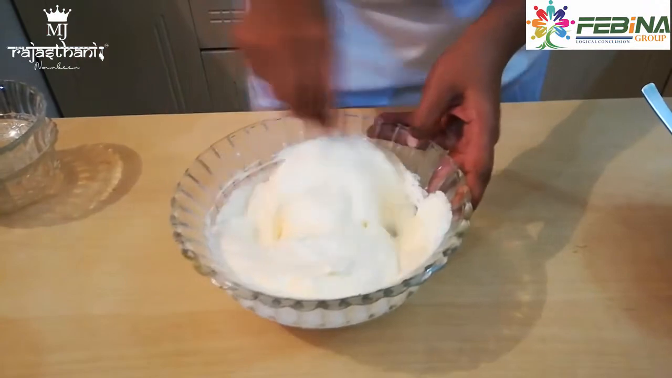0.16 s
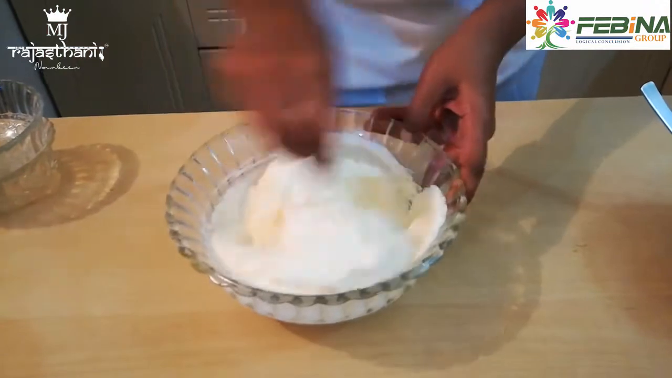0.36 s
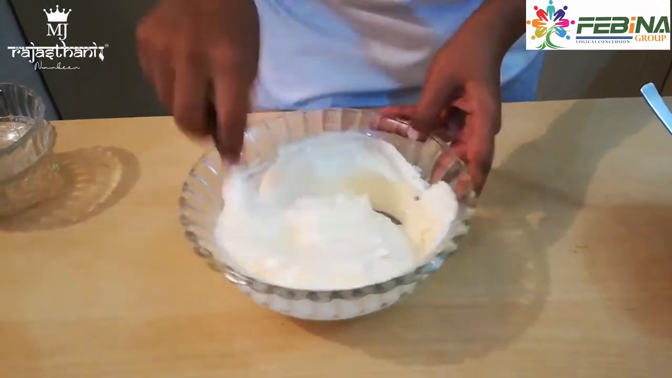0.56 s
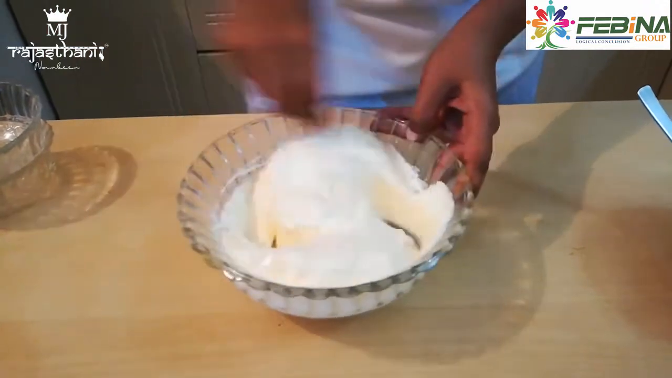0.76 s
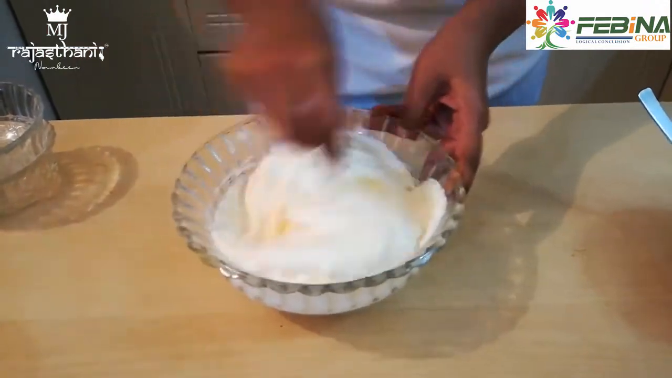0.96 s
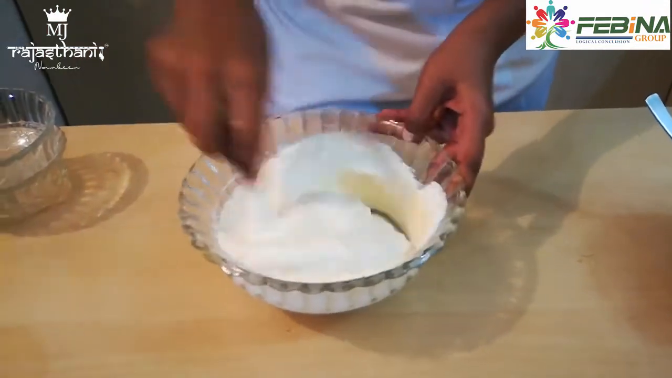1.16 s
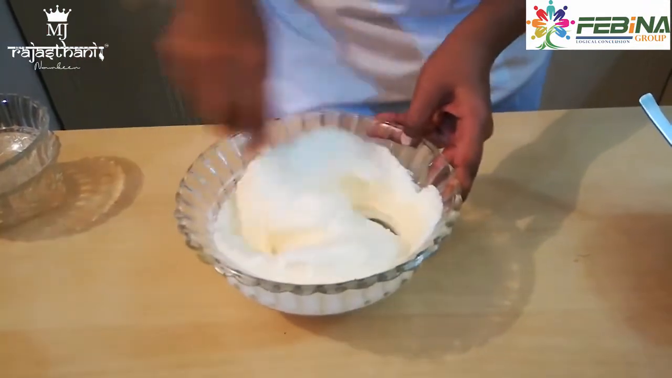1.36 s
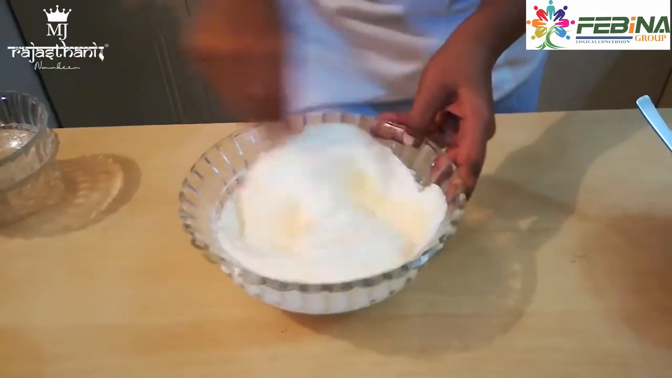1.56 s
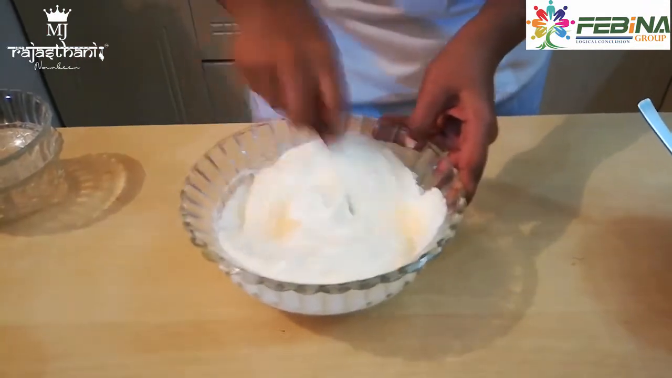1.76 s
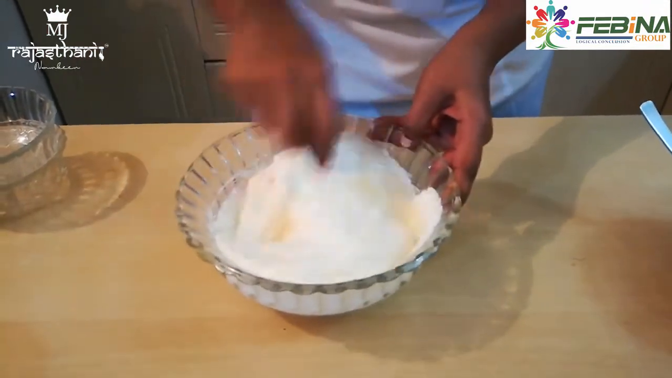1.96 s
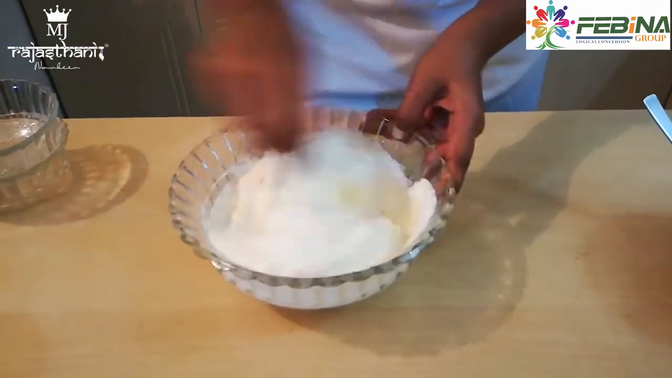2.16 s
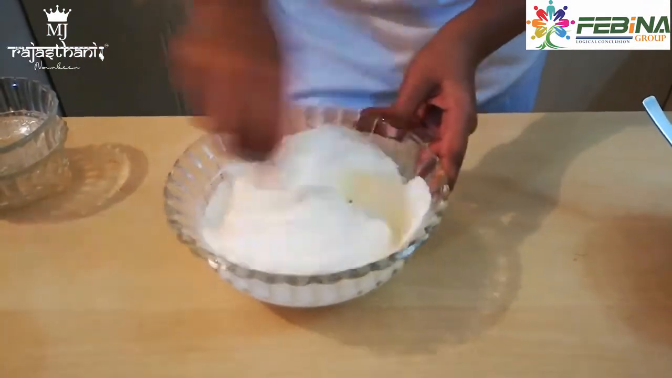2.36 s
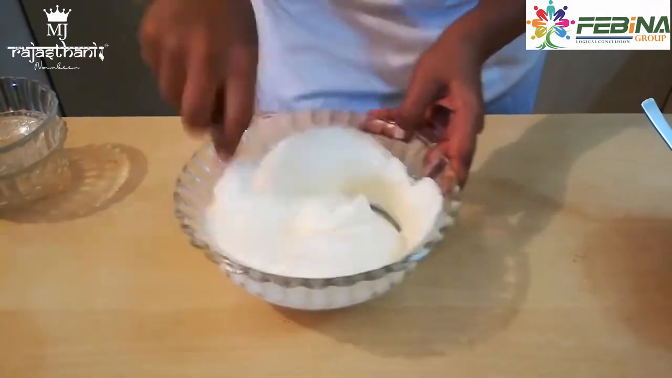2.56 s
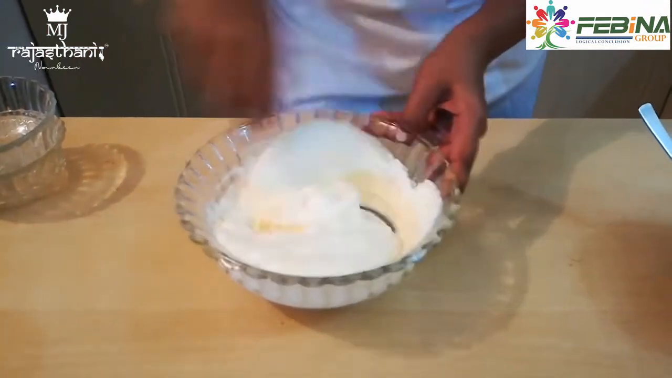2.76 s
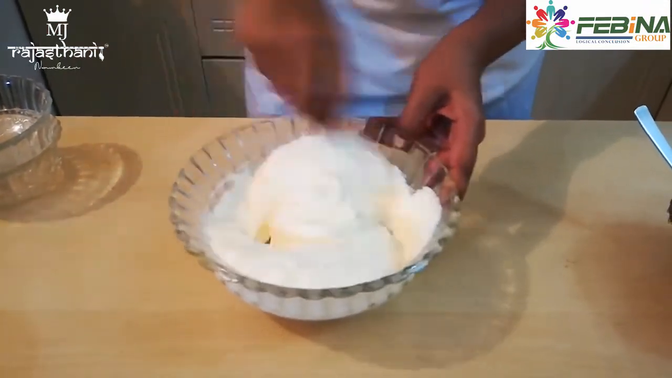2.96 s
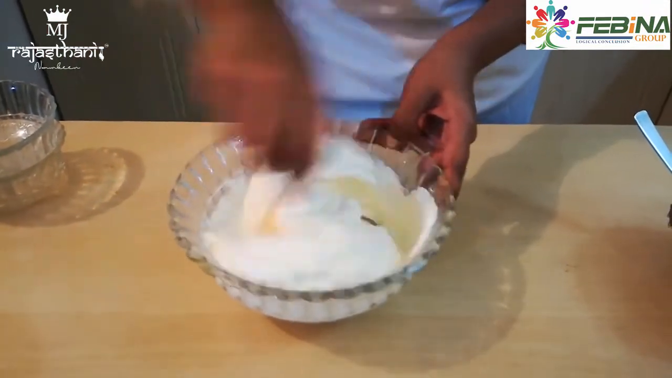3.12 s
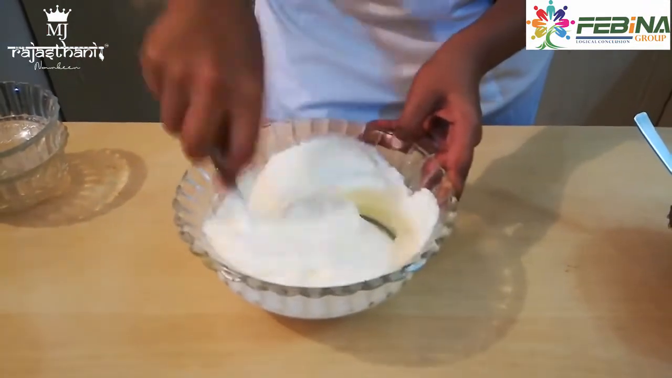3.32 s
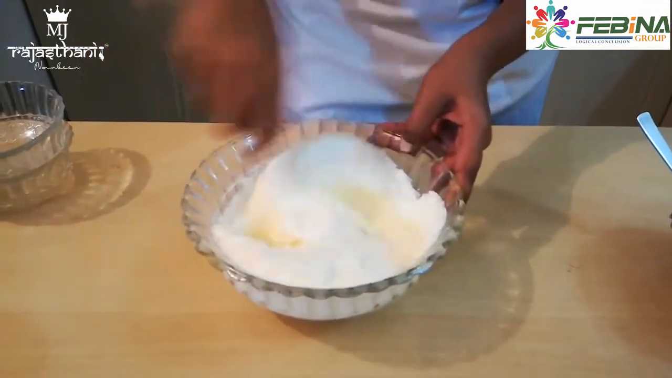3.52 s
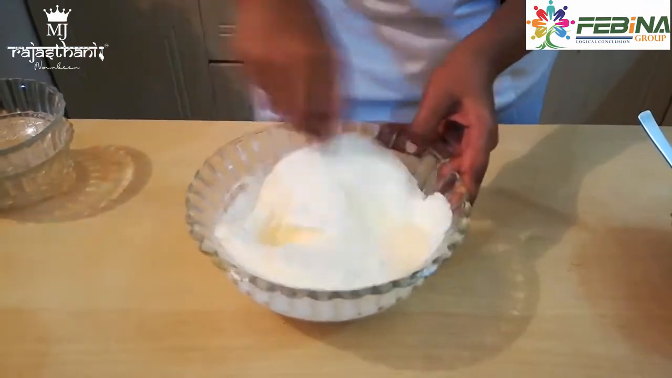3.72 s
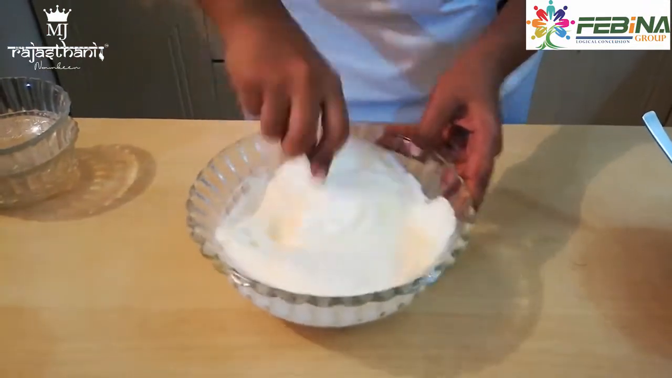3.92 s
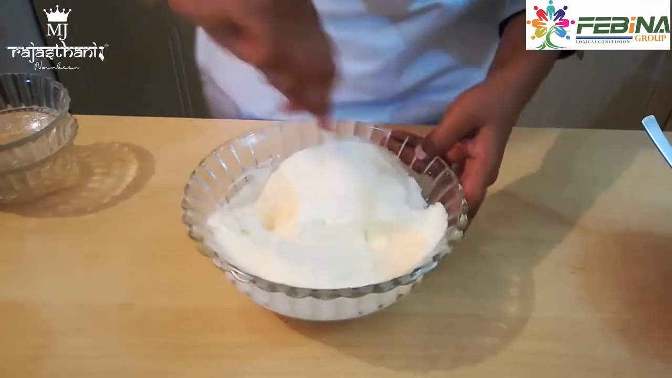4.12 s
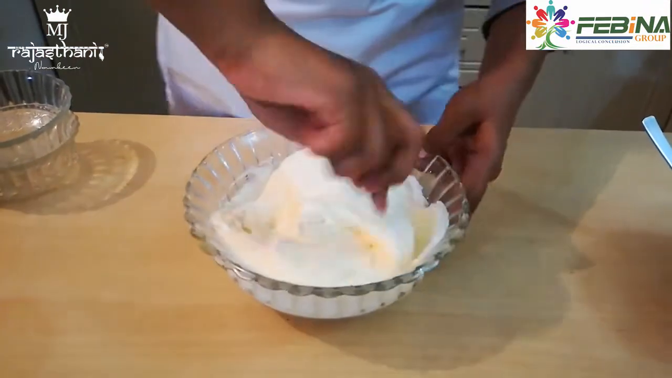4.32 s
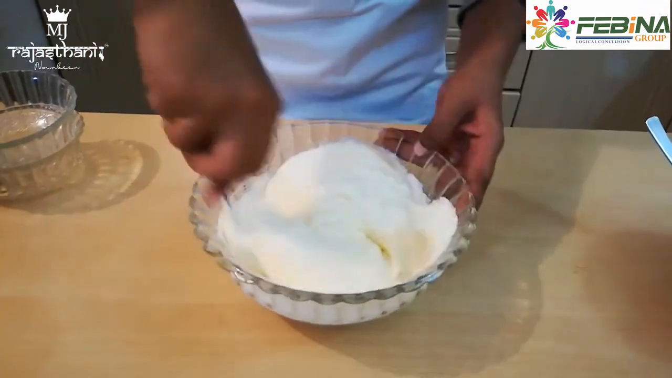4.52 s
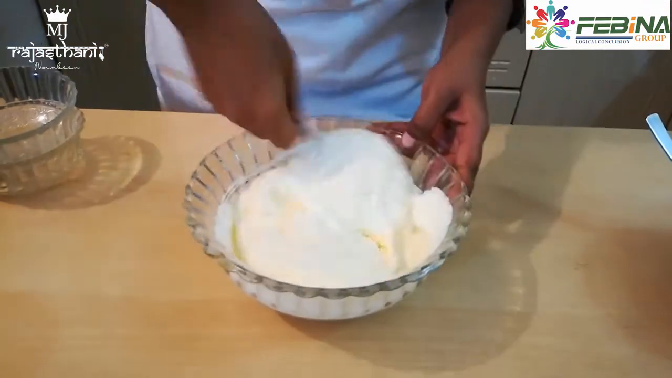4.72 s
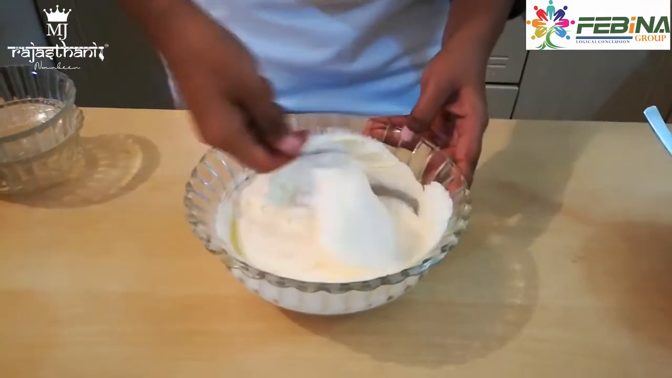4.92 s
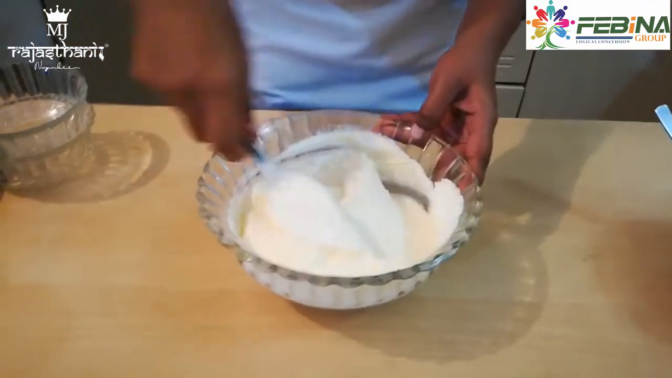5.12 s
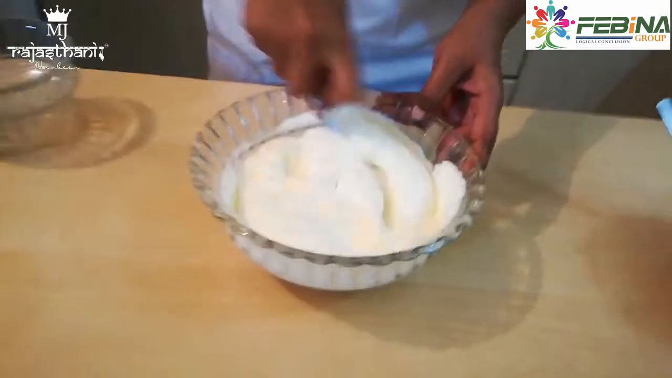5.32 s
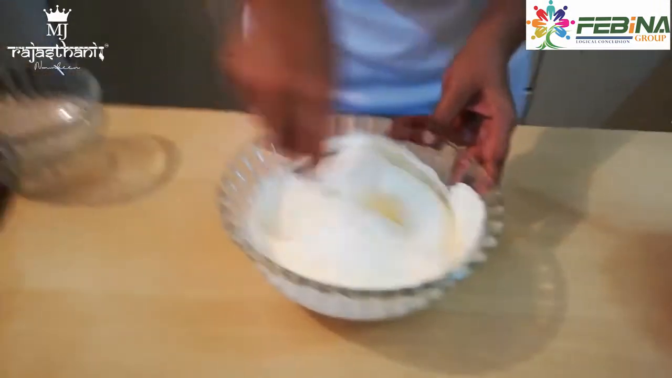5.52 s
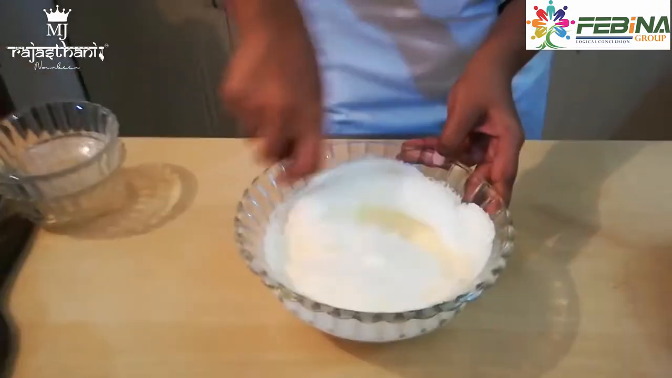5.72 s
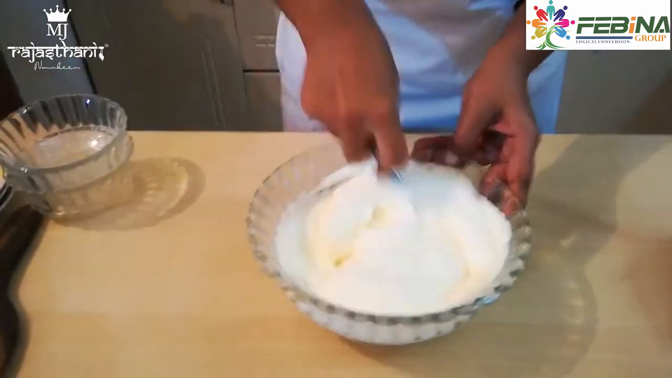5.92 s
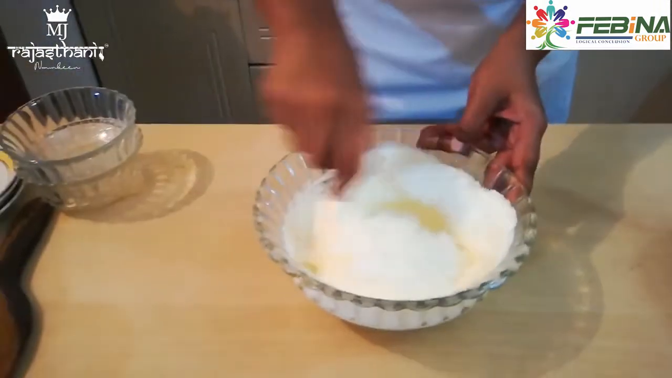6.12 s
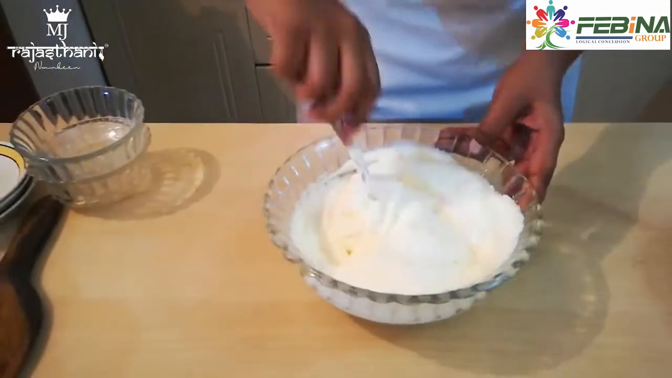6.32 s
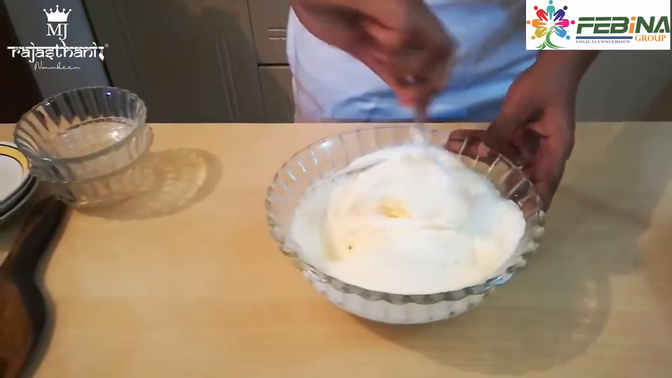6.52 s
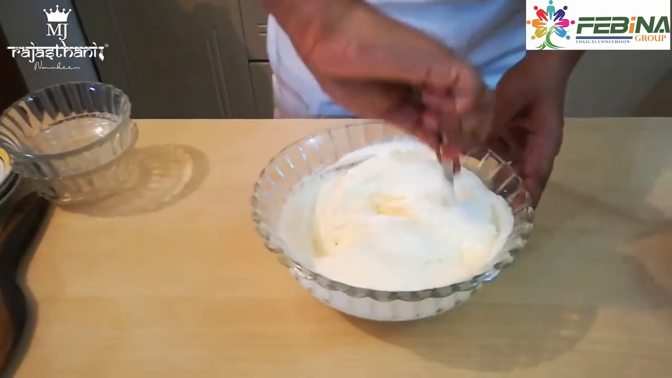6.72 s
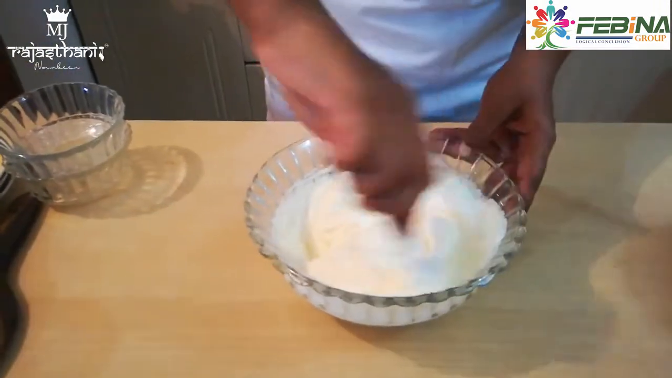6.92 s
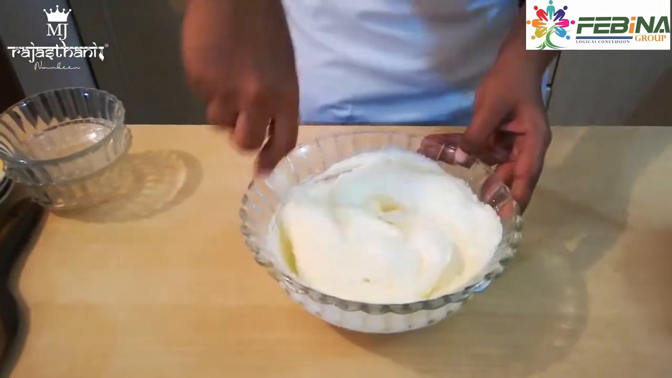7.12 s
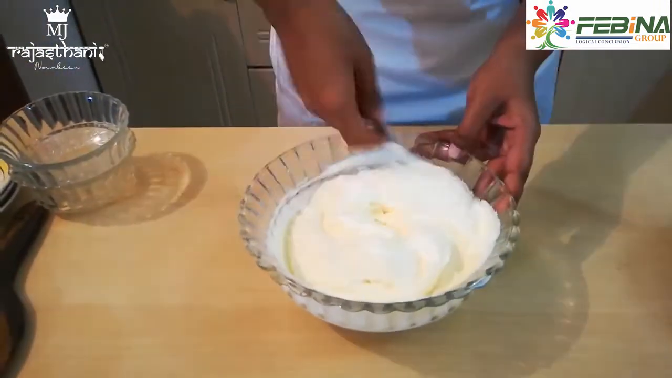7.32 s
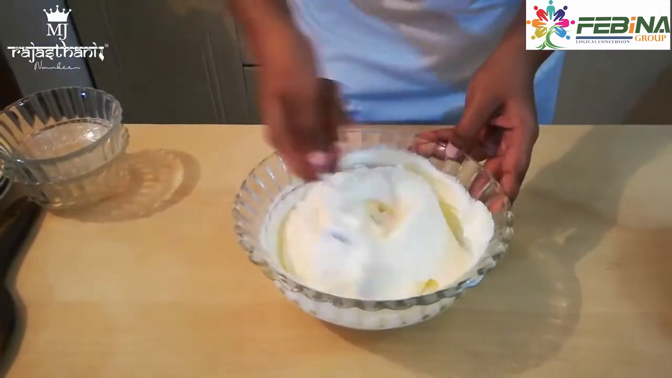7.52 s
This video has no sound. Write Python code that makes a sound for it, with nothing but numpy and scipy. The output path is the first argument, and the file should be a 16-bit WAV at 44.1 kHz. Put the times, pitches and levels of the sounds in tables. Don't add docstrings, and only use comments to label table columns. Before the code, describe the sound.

Close up in a small hard-walled kitchen, a steel spoon beats thick cream in a glass bowl. Soft wet drags and rubbing swell with every stroke, while short, choked clinks strike the glass and the bowl thumps low on the wooden counter. The stirring is fast and busy for four seconds, then sparser, with a few knocks and faint scrapes near the end over a quiet room hum.

```python
import sys
import numpy as np
from scipy import signal
from scipy.fft import rfft, irfft, next_fast_len
from scipy.io import wavfile
from scipy.ndimage import map_coordinates

SR = 44100
rng = np.random.default_rng(int(sys.argv[2]) if len(sys.argv) > 2 else 0)


def generate_wav(sig):
    pcm = np.round(np.clip(np.atleast_2d(sig).T, -1, 1) * 32767).astype(np.int16)
    wavfile.write(sys.argv[1], SR, pcm)


def field_ratio(decibels):
    return 10 ** (np.asarray(decibels, dtype=float) / 20)


N = 338667

# pitch_hz, level_db, t60_s (time to fade by 60 dB)
WALL_MODES = [(480, -10.5, 0.046), (721, 8, 0.021), (870, 1, 0.03), (980, 0, 0.0093), (1100, 3, 0.035),
              (1205, -4, 0.039), (1457, 7.5, 0.0068), (1630, -3, 0.037), (1832, 6, 0.016),
              (1958, -0.5, 0.034), (2100, 4.5, 0.014)]
# pitch_hz, level_db, t60_s
RIM_MODES = [(2810, 6, 0.0086), (3230, -3.5, 0.014), (3580, 10.5, 0.0099), (4200, 5, 0.009),
             (4685, -6.5, 0.018), (4910, 6.5, 0.0063), (5200, -11.5, 0.024), (5600, 8, 0.0047)]
# pitch_hz, level_db, t60_s
EDGE_MODES = [(6410, -10, 0.016), (7110, -9, 0.0081), (7485, -4.5, 0.011), (8390, 8, 0.0021),
              (10100, -14, 0.0059), (11470, 4.5, 0.0015), (14400, -14.5, 0.003)]
# pitch_hz, level_db, t60_s
COUNTER_MODES = [(30.2, -8, 0.3), (74.1, -17, 1), (120.7, 3.5, 0.27), (144.6, 1.5, 0.31),
                 (171.95, -1.5, 0.39), (207.2, -5, 0.38), (235, -18, 0.21), (280.3, -5, 0.35)]


def unit(x):
    return x / np.sqrt(np.mean(x ** 2) + 1e-20)


def along(points, hz):
    f, v = np.transpose(points)
    return np.interp(np.log(hz + 1), np.log(f + 1), v)


def wobble(rate):
    knots = rng.standard_normal(int(N * rate / SR) + 4)
    return map_coordinates(knots, [np.arange(N) * rate / SR])


def filtered(x, response):
    m = next_fast_len(x.shape[-1] + 8192)
    spectrum = rfft(x, m) * response(np.fft.rfftfreq(m, 1 / SR))
    return irfft(spectrum, m)[..., :x.shape[-1]]


def diffuse(pair):
    # pitch_hz, left_right_likeness (0 to 1)
    likeness = [(30, 1.0), (150, 0.69), (300, 0.24), (600, 0.16), (2000, 0.12), (10000, 0.016)]

    def mix(hz):
        turn = np.arccos(np.clip(along(likeness, hz), -1, 1)) / 2
        return np.array([np.cos(turn), np.sin(turn)])

    mid, side = filtered(pair, mix)
    return np.array([mid + side, mid - side])


def rush(spectrum, grain_db, rate):
    noise = rng.standard_normal((2, N)) * field_ratio(grain_db * wobble(rate))
    coloured = filtered(noise, lambda hz: field_ratio(along(spectrum, hz)))
    return unit(diffuse(coloured))


def ring(modes, t, scatter_db, detune, rise, favour_db=0, stagger=np.pi):
    hz, db, t60 = np.transpose(modes)[:, :, None]
    db = db + favour_db
    chance = rng.standard_normal((2, len(modes), 1))
    lag = stagger * np.arange(len(modes))[:, None]
    phase = 2 * np.pi * hz * (1 + detune * chance[1]) * t - lag
    waves = field_ratio(db + scatter_db * chance[0] - 60 * t / t60) * np.sin(phase)
    swell = 1 - np.exp(-t / rise)
    return waves.sum(axis=0) * swell / np.sqrt(np.sum(field_ratio(db) ** 2))


def favour(modes, spot_hz, top_db, spread):
    hz = np.transpose(modes)[0][:, None]
    return top_db * np.exp(-(np.log(hz / spot_hz) / spread) ** 2)


def hush():
    # pitch_hz, level_db
    room_colour = [(20, 8), (30, 1), (60, 5), (90, -25), (125, -44), (200, 5), (330, -0.5), (400, -14.5),
                   (1200, -16), (2200, -19.5), (5200, -26.5), (8000, -26), (15500, -31), (16300, -40)]
    # pitch_hz, level_db
    whine = [(124, -70), (199, -63), (248, -96), (6659, -82.5), (6756, -87)]
    t = np.arange(N) / SR
    tones = 0
    for hz, db in whine:
        tones = tones + field_ratio(db + 2 * wobble(7)) * np.sin(2 * np.pi * hz * t + .8 * wobble(12))
    return field_ratio(-59) * rush(room_colour, grain_db=.3, rate=6) + tones


def strokes(layer):
    # peak_s, rocking_db, drag_through_cream_db, steel_rubbing_glass_db
    stroke_rows = [(0.0, -49.5, -36.5, -46), (0.2, -53.5, -45, -39), (0.28, -70, -41, -44),
                   (0.43, -42, -46.5, -90), (0.7, -38, -38, -53), (0.998, -41, -42, -46.5),
                   (1.279, -40.5, -35, -49.5), (1.56, -46, -39.5, -45), (1.82, -44, -39.5, -47),
                   (2.029, -38, -35, -48), (2.252, -50, -37, -44.5), (2.631, -59, -31, -44),
                   (2.74, -39, -59, -79), (2.969, -36.5, -34.5, -50.5), (3.25, -39, -35, -52),
                   (3.49, -37.5, -33, -49), (3.59, -66, -59, -54), (3.74, -64.5, -38, -54),
                   (3.89, -32.5, -39.5, -50), (3.999, -61, -36, -49), (4.27, -52, -55.5, -65.5),
                   (4.56, -61.5, -68, -50), (4.81, -56.5, -52, -44.5), (5.67, -51, -45, -58.5),
                   (5.97, -45, -44, -53.5), (6.09, -43.5, -42.5, -64), (6.29, -65, -43, -64),
                   (6.97, -75, -72, -56.5), (7.15, -71, -50.5, -72), (7.385, -60, -50.5, -52.5)]
    rest_db = [-71.5, -69, -67]
    swell_db_per_s, fade_db_per_s = [111, 75.5, 140][layer], [64, 72, 80.5][layer]
    t, rows = np.arange(0, N + 100, 100) / SR, np.array(stroke_rows)
    since = t - rows[:, :1]
    db = rows[:, 1 + layer, None] - np.maximum(-swell_db_per_s * since, fade_db_per_s * since)
    power = np.sum(field_ratio(db) ** 2, axis=0) + field_ratio(rest_db[layer]) ** 2
    return np.interp(np.arange(N) / SR, t, 10 * np.log10(power))


def counter_push(f):
    board = 0
    for mode_hz, db, t60 in COUNTER_MODES:
        board = board + field_ratio(db) * 1j * f / (mode_hz * mode_hz - f * f + 1j * f * 2.44 / t60)
    return board / (1 + (f / 400) ** 4)


def stirring():
    # pitch_hz, level_db
    drag_colour = [(150, -3.5), (250, -7.5), (400, -4.5), (900, -3.5), (1150, -4), (2000, -10), (3000, -19),
                   (4500, -27.5), (7000, -120)]
    # pitch_hz, level_db
    rub_colour = [(1290, -52), (2200, -7.5), (3000, -1.5), (3500, -2), (4500, -2), (5400, -5), (6300, -7.5),
                  (7300, -9), (9000, -19.5), (15500, -35)]
    sway_colour = [(15, -24), (30, -21), (60, -14.0), (100, -22.0), (160, -47), (400, -120)]  # Hz, dB
    rock_db, drag_db, rub_db = [strokes(layer) for layer in range(3)]
    rock = unit(filtered(rng.standard_normal(N) * field_ratio(1.6 * wobble(8.1)), counter_push))
    sway = rush(sway_colour, grain_db=4.5, rate=1.86)[0]
    drag = rush(drag_colour, grain_db=2.5, rate=140)
    rub = rush(rub_colour, grain_db=2.2, rate=170)
    bowl = field_ratio(rock_db + 2.5) * rock + field_ratio(rock_db - 13.0) * sway
    return bowl + field_ratio(drag_db - 4.5) * drag + field_ratio(rub_db - 6.5) * rub


def contacts():
    # start_s, peak_db, wall_hz, rim_hz, brightness_db
    rim_clinks = [(0.1239, -12.5, 1080, 5300, -1.5), (0.631, -27, 1440, 3730, 8),
                  (0.934, -22.5, 1360, 3100, -9.5), (1.1866, -26.5, 1110, 6000, -19),
                  (1.207, -22, 1040, 3600, -10.5), (1.3299, -29, 1080, 4800, -7),
                  (1.4807, -22, 1200, 3000, -5), (1.7301, -22.5, 2330, 3230, -15.5),
                  (1.9783, -26.5, 1630, 2830, 12), (2.2099, -23, 1230, 4800, -3),
                  (2.4382, -31, 1700, 5200, 12), (2.4515, -22.5, 1340, 3630, -14),
                  (2.7948, -35.5, 1200, 5200, -6), (2.9241, -15.5, 1460, 5200, -7.5),
                  (3.5232, -25.5, 1070, 5000, 28), (3.6672, -27, 1630, 5330, -7),
                  (3.897, -10, 990, 3540, -15.5), (4.4727, -14, 1100, 4450, -12.5),
                  (4.6031, -21, 1015, 3600, -14.5), (4.7295, -22.5, 1700, 4880, -11.5),
                  (4.8085, -34.5, 1200, 4370, -7), (4.8516, -24, 1205, 5200, -8.5),
                  (5.9003, -16.5, 2160, 4250, -12.5), (6.1853, -15.5, 1920, 4200, -13.5)]
    # start_s, peak_db, wall_hz, brightness_db
    wall_knocks = [(0.314, -31.5, 1900, -15), (0.3706, -29, 990, -15), (0.4775, -35.5, 1550, -14),
                   (0.812, -30, 1220, -29), (0.8749, -30, 1090, -29), (1.162, -28, 1230, -36),
                   (1.453, -33, 1100, -24.5), (1.575, -37, 1060, 8), (1.8331, -28, 1030, -16.5),
                   (2.07, -42, 1330, -6), (2.366, -32, 1010, -14), (2.5305, -18.5, 980, -19.5),
                   (3.004, -29, 1510, -13), (3.164, -24, 1460, -17.5), (3.1835, -24, 980, -28),
                   (3.2664, -30.5, 1090, 21), (3.378, -39, 1050, -30.5), (3.395, -15.5, 1100, -11),
                   (3.4446, -20, 870, -32), (3.6468, -34.5, 1145, 15), (3.793, -36, 1690, 9),
                   (3.8196, -27, 1160, -38), (5.6084, -20.5, 1060, -16), (5.861, -34.5, 1400, -27),
                   (6.013, -33, 1040, -23), (6.9303, -16.5, 980, -18), (7.1502, -36.5, 1610, -20),
                   (7.21, -30, 1610, -20), (7.2528, -25, 1440, -14.5), (7.414, -38, 1140, -26)]
    rim_over_wall = 2.75
    return rim_clinks + [(s, db, hz, rim_over_wall * hz, bright_db) for s, db, hz, bright_db in wall_knocks]


def overtones(s, t):
    # start_s, peak_db, pitch_hz
    brief_modes = [(0.1239, -18, 7420), (0.4768, -20.5, 1550), (0.631, -30, 1510), (0.631, -33, 7700),
                   (0.631, -38, 9460), (0.934, -22, 480), (0.934, -23, 3160), (0.934, -36, 8460),
                   (0.934, -22, 870), (1.207, -35, 4570), (1.207, -46, 4300), (1.4807, -40, 4650),
                   (1.4807, -40, 4260), (1.4807, -38, 3750), (1.7301, -28, 2870), (1.7301, -36, 4200),
                   (1.7301, -35, 4700), (1.9783, -40, 534), (1.9783, -38, 2700), (2.2099, -36, 4040),
                   (2.2099, -23.5, 3240), (2.2099, -33, 5170), (2.5306, -23.5, 650), (2.9241, -30, 3040),
                   (3.2676, -39, 2160), (3.3948, -18.5, 1880), (3.3948, -18, 2980), (3.5232, -26, 7630),
                   (3.5232, -39, 2960), (3.5232, -31, 1870), (3.6672, -24, 510), (3.6672, -20.5, 840),
                   (3.6672, -21.5, 1970), (4.4727, -29.5, 1660), (4.4727, -42.5, 5140), (4.8085, -32, 1200),
                   (4.8516, -23.5, 1690), (5.6087, -25.5, 2125), (5.6087, -42.5, 7700),
                   (5.9003, -30.5, 5680), (7.1493, -54, 3600), (7.2532, -34.5, 4970), (7.2667, -35, 1680),
                   (7.2667, -31, 1130), (7.411, -37, 3880), (7.411, -35, 1650), (7.411, -39, 4160)]
    # start_s, peak_db, pitch_hz, t60_s
    own_modes = [(0.1239, -6, 828, 0.011), (0.1239, -24, 3180, 0.016), (0.631, -44, 13000, .004),
                 (1.4807, -29, 9400, 0.0053), (1.4807, -42, 13500, .004), (3.897, -42, 12600, .004),
                 (4.8085, -36, 1205, 0.11), (4.8516, -26.5, 1203, 0.062), (6.1853, -18, 2290, 0.014),
                 (6.1853, -28.5, 977, 0.051), (0.1239, -24, 5000, 0.012), (7.21, -20, 1680, 0.012)]
    rows = [(at, db + 0.5, hz, 0.0084 + 10.7 / hz) for at, db, hz in brief_modes] + own_modes
    total = 0
    for at, db, hz, t60 in rows:
        if abs(at - s) < .005:
            total = total + field_ratio(db - 60 * t / t60) * np.sin(2 * np.pi * hz * t)
    return total * (1 - np.exp(-t / 0.00093))


def tails(count):
    # pitch_hz, t60_s
    kitchen = [(300, 0.7), (1000, 0.47), (3000, 0.31), (7300, 0.48), (10000, 0.28), (14000, 0.2)]
    first_wall_s, slap_s, slap_width_s = .009, .014, 0.0057
    slap_db, nearby_db = -5.5, -5.5
    hz, t, z = signal.stft(rng.standard_normal((count, 2, SR // 2)), SR, nperseg=256)
    fading = z * field_ratio(-60 * t / along(kitchen, hz)[:, None])
    tail = signal.istft(fading, SR, nperseg=256)[1]
    t = np.arange(tail.shape[-1]) / SR
    slap = field_ratio(slap_db) * np.exp(-((t - slap_s) / slap_width_s) ** 2)
    onset = np.clip((t - first_wall_s) / 0.0017, field_ratio(nearby_db) * (t > .003), 1)
    tail = tail * onset * (1 + slap)
    return tail / np.linalg.norm(tail[0, 0])


def walls(strikes, count):
    spots, dry = np.zeros((count, N + SR)), np.zeros((2, N + SR))
    lags = .00004 * rng.standard_normal(len(strikes))
    for k, (s, clack) in enumerate(sorted(strikes, key=lambda row: row[0])):
        blur = 0.25 + field_ratio(4 - 60 * np.arange(len(clack)) / SR / 0.029)
        spots[k % count, round(s * SR):][:len(clack)] += clack * blur
        dry[0, round((s + lags[k] / 2) * SR):][:len(clack)] += clack
        dry[1, round((s - lags[k] / 2) * SR):][:len(clack)] += clack
    m = next_fast_len(N + SR)
    answers = sum(rfft(x, m) * rfft(tail, m) for x, tail in zip(spots, tails(count)))
    return dry[:, :N], irfft(answers, m)[:, :N]


def glass_blow(db, wall_hz, rim_hz, bright_db, t):
    dull_db = -7
    wall_db, edge_db = -11 - 0.29 * bright_db, -11.5 + 0.49 * bright_db
    rim_db = -.8 * np.maximum(wall_db + 11.0, 0) + 3.5 + 0.78 * np.minimum(bright_db - dull_db, 0)
    touch_s = 0.00023 * field_ratio(0.58 * np.clip(dull_db - bright_db, 0, 24))
    touch = 1 - np.exp(-(t / touch_s) ** 2)
    wall_spot = favour(WALL_MODES, wall_hz, top_db=np.clip(-.36 * db, 5, 9), spread=.11)
    rim_spot = favour(RIM_MODES, rim_hz, top_db=5, spread=.14)
    wall = ring(WALL_MODES, t, scatter_db=1.5, detune=.006, rise=.0002, favour_db=wall_spot, stagger=1.6)
    rim = ring(RIM_MODES, t, scatter_db=2, detune=.025, rise=.0003, favour_db=rim_spot, stagger=2.2)
    edge = ring(EDGE_MODES, t, scatter_db=2, detune=.03, rise=.0003)
    clack = field_ratio(wall_db + 6) * wall * touch + field_ratio(rim_db) * rim + field_ratio(edge_db + 12) * edge
    clack += field_ratio(wall_db - 31 - 60 * t / 0.014) * np.sin(2 * np.pi * 833 * t)
    snap = touch * field_ratio(wall_db - 4) * np.sin(2 * np.pi * wall_hz * t)
    snap += field_ratio(rim_db - 10.5) * np.sin(2 * np.pi * rim_hz * t)
    clack += snap * field_ratio(-60 * t / 0.0044) * (1 - np.exp(-t / 0.00043))
    sweep_hz, sweep_s = 11000, .0007
    sweep = np.sin(2 * np.pi * sweep_hz * sweep_s * (1 - np.exp(-t / sweep_s)))
    clack += field_ratio(rim_db - 11.5 - 60 * t / 0.0039) * touch * sweep
    return clack, touch


def clinks():
    # start_s, peak_db, pitch_hz
    pops = [(0.328, -40, 2850), (0.3863, -45, 4570), (0.73, -42, 2920), (0.7558, -44.5, 3680),
            (1.3283, -43, 6600), (1.6067, -49, 4970), (2.2984, -46, 2670), (2.56, -50, 7140),
            (2.6737, -48, 3600), (3.0194, -46, 2840), (3.137, -44.5, 3170), (3.424, -39, 2840),
            (4.7948, -43.5, 4420), (5.1233, -57, 5200), (5.513, -56.5, 2860), (5.586, -58, 7960),
            (6.415, -56.5, 4650), (6.7655, -76.5, 5330), (6.8494, -74, 2520), (7.2305, -55, 5200),
            (7.2666, -51, 3540), (7.521, -52, 3900), (0.398, -43, 3150), (1.0152, -36.5, 2700),
            (1.3887, -54, 3730), (2.8384, -35, 2220), (3.631, -45.5, 4700), (3.769, -46, 5540),
            (4.133, -50.5, 4800), (7.42, -64.5, 5040)]
    # pitch_hz, direct_sound_gain_db
    facing = [(500, -1), (1300, -1), (3200, 3.5), (5000, 8.5), (9000, 1.5)]
    t = np.arange(SR // 8) / SR
    early_s = .0004
    strikes = []
    for s, db, wall_hz, rim_hz, bright_db in contacts():
        clack, touch = glass_blow(db, wall_hz, rim_hz, bright_db, t)
        strikes.append((s - early_s, field_ratio(db - 2.5) * clack + touch * overtones(s, t)))
    for s, db, hz in pops:
        tone = np.sin(2 * np.pi * hz * t) + .03 * rng.standard_normal(len(t))
        pop = field_ratio(db + 8.5 - 60 * t / 0.005) * (1 - np.exp(-t / 0.00019)) * tone
        strikes.append((s, pop + overtones(s, t)))
    direct, wet = walls(strikes, count=9)
    return filtered(direct, lambda hz: field_ratio(along(facing, hz))), field_ratio(-4.0) * diffuse(wet)


def thumps():
    # start_s, peak_db, hardness_db, favoured_pitch_hz
    landings = [(0.367, -24.5, -28.5, 145), (0.628, -21.5, -21, 120), (0.870, -22, -24.5, 145),
                (0.957, -31.5, -12, 135), (1.16, -19, -18, 146), (1.197, -18, -25, 148),
                (1.232, -36.5, -2, 145), (1.487, -27, -17, 180), (1.584, -19.5, -21, 148),
                (1.727, -23, -15, 145), (1.833, -18, -25, 147), (1.986, -29, -9.5, 280),
                (2.226, -21.5, -25.5, 140), (2.447, -23, -21, 208), (2.527, -11.5, -24, 153),
                (2.563, -30, -30, 145), (2.671, -26, -28, 280), (2.761, -29.5, -18.5, 170),
                (2.922, -21.5, -12.5, 195), (3.002, -24, -18.5, 120), (3.118, -27, -22.5, 173),
                (3.184, -20.5, -16.5, 280), (3.263, -16, -23, 153), (3.368, -20.5, -19.5, 165),
                (3.441, -20, -14.5, 280), (3.689, -23, -15.5, 280), (3.765, -17, -21.5, 130),
                (3.882, -22.5, -15.5, 155), (5.565, -25.5, -21, 135), (5.858, -19.5, -30.5, 148),
                (0.685, -26, -16, 280), (2.623, -42, -10, 130), (2.691, -26, -13.5, 280),
                (5.988, -39.5, -3.5, 120)]
    # start_s, peak_db
    roll_backs = [(2.302, -29), (2.353, -28), (2.854, -33), (3.62, -38), (4.126, -46), (4.227, -34.5),
                  (4.865, -28), (5.62, -30), (6.393, -39), (7.44, -32), (7.469, -31.5), (7.269, -49),
                  (7.59, -43.5)]
    # pitch_hz, level_db, t60_s
    hard_modes = [(333.5, -9.5, 0.39), (377.7, -12.5, 0.46), (389.4, -12, 0.55), (448.4, -4.5, 0.25),
                  (504, -5.5, 0.35), (524, -1.5, 0.088), (608.5, -4, 0.14), (703, -3, 0.07),
                  (822, -5.5, 0.14), (1094, -7.5, 0.18)]
    rate = SR // 6
    delay_s = .004
    tilt_hz = 135
    low, hard = np.zeros(N // 6 + rate), np.zeros((2, N // 6 + rate))
    t = np.arange(rate // 2) / rate
    tilts = [(s, db, -24, tilt_hz) for s, db in roll_backs]
    handed = [(s - 0.00783, db - 20, -17, tilt_hz) for s, db, *_ in contacts() if db > -22]
    for s, db, hard_db, foot_hz in landings + tilts + handed:
        at = round((s + delay_s) * rate)
        side_db = favour(COUNTER_MODES, foot_hz, top_db=8, spread=0.13)
        thud = ring(COUNTER_MODES, t, scatter_db=1.5, detune=0.01, rise=0.0024, favour_db=side_db, stagger=0)
        low[at:][:len(t)] -= field_ratio(db - 5) * thud
        both = [ring(hard_modes, t, scatter_db=4.5, detune=0.011, rise=0.00097, stagger=0) for ear in range(2)]
        hard[:, at:][:, :len(t)] += field_ratio(db + hard_db + 9.5) * np.array(both)
    hard = signal.resample_poly(hard, 6, 1, axis=1)[:, :N]
    return signal.resample_poly(low, 6, 1)[:N] + diffuse(hard)


def grazes():
    # start_s, peak_db, pitch_hz
    glints = [(0.4785, -40, 14130), (0.6157, -43, 5200), (0.7568, -42, 8040), (1.1764, -42, 6440),
              (1.484, -38, 11500), (0.631, -39, 11500), (2.211, -49, 10500), (1.9695, -31, 1530),
              (1.9689, -42, 4500), (1.9689, -41, 8000), (4.134, -49, 8500), (2.3046, -39, 8300),
              (2.452, -29, 8900), (2.654, -44, 6000), (2.662, -44, 14000), (2.6738, -31, 6400),
              (2.6735, -46, 10500), (3.14, -50, 9500), (3.1394, -53, 13000), (3.6518, -49, 9000),
              (3.6518, -45, 12500), (3.769, -45, 9000), (3.769, -51, 12500), (3.911, -39.5, 13500),
              (3.911, -27, 3800), (3.5218, -36, 11500), (7.212, -39, 3980), (7.2322, -40, 4300),
              (7.521, -50, 4200), (7.268, -51, 5200)]
    # start_s, peak_db, pitch_hz
    bumps = [(0.502, -34, 1200), (0.612, -38, 1480), (1.107, -40, 837), (1.236, -35, 614),
             (1.386, -33, 1210), (1.584, -32, 620), (1.979, -33, 600), (1.993, -23.5, 1100),
             (2.221, -26.5, 1270), (2.271, -28.5, 1170), (2.629, -24, 824), (2.695, -36, 619),
             (2.768, -35, 1120), (3.101, -41, 869), (3.119, -36, 1270), (3.587, -41, 1220),
             (3.697, -25, 1100), (3.825, -22.5, 1230), (4.135, -32, 840)]
    out, t = np.zeros(N + SR), np.arange(SR // 20) / SR
    for s, db, hz in glints + bumps:
        t60 = 0.0012 + 17 / hz
        rise = (1 - np.exp(-t * hz / 0.58)) ** 2
        life = field_ratio(db + 3 - 60 * t / t60) * rise
        out[round(s * SR):][:len(t)] += life * np.sin(2 * np.pi * hz * t)
    return out[:N]


def scrapes():
    # start_s, length_s, level_db, pitch_hz
    slides = [(4.79, .04, -54, 4400), (7.33, .015, -63, 5300), (7.371, .028, -53, 3550),
              (7.372, .026, -55, 5300), (2.64, .04, -51, 4300), (7.372, .026, -57, 7030),
              (7.27, .09, -61, 3590), (7.43, .12, -66, 3590), (7.155, .02, -66, 5300),
              (7.42, .04, -56, 1205), (7.55, .08, -61, 1500), (7.28, .1, -60, 1630)]
    out, t = np.zeros((2, N + SR)), np.arange(SR // 5) / SR
    for s, length, db, hz in slides:
        dying = field_ratio(-3.5 - 60 * (t - length) / 0.28)
        shape = np.clip(t / 0.0024, 0, 1) * np.where(t < length, 1, dying)
        modes = RIM_MODES + EDGE_MODES[:3] if hz > 2500 else WALL_MODES
        spot_db = favour(modes, hz, top_db=17, spread=0.12)
        body = ring(modes, t[:900], scatter_db=-4.5, detune=0.011, rise=0.00015, favour_db=spot_db)
        chatter = rng.standard_normal((2, len(t))) * field_ratio(3.2 * rng.standard_normal(len(t)))
        sound = unit(signal.fftconvolve(chatter, body[None], axes=1)[:, :len(t)])
        out[:, round(s * SR):][:, :len(t)] += field_ratio(db) * shape * sound
    return out[:, :N]


def scene():
    # pitch_hz, left_minus_right_db
    lean = [(100, 0.5), (250, 1), (500, -5.5), (1000, -2.5), (1300, -2.5), (1650, -6), (2300, 1), (4000, 1),
            (6200, 11), (9800, 14), (15000, -6)]
    # pitch_hz, left_leads_radians
    lead = [(20, 0), (140, .1), (340, -.7), (870, 2.7), (1120, 1.1), (1600, .6), (2050, 3), (2400, .7),
            (3300, 1.8), (4400, 3.2), (8600, 5), (16000, 8)]
    direct, wet = clinks()
    near = direct + wet + grazes() + thumps() + stirring() + scrapes()
    half = np.array([[.5], [-.5]])

    def two_sides(hz):
        return field_ratio(half * along(lean, hz)) * np.exp(1j * half * along(lead, hz))

    return filtered(near, two_sides) + hush()


def band_limit(x):
    return signal.sosfilt(signal.butter(12, 16670, fs=SR, output="sos"), x)


def record(dry):
    limited = filtered(dry, lambda hz: hz < 16400)
    return band_limit(limited)


dry = scene()
out = record(dry)
generate_wav(out)
```